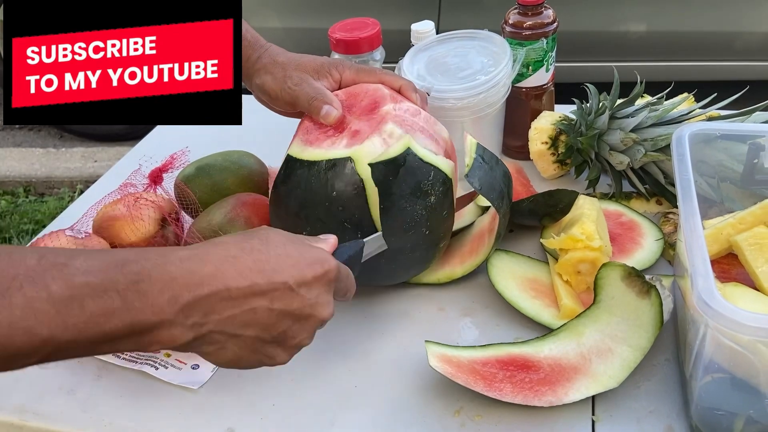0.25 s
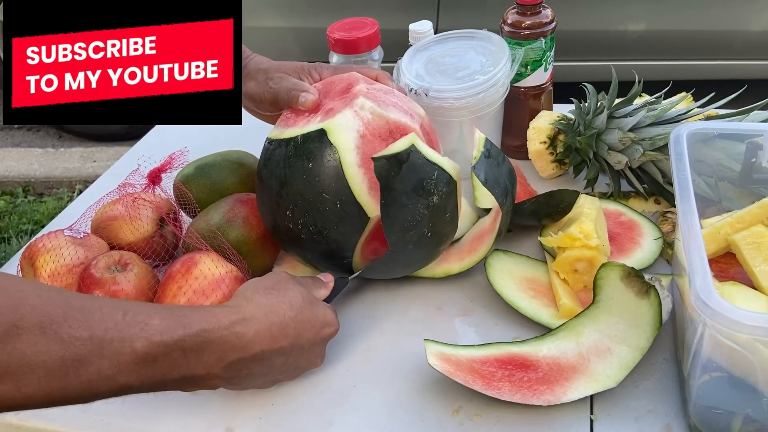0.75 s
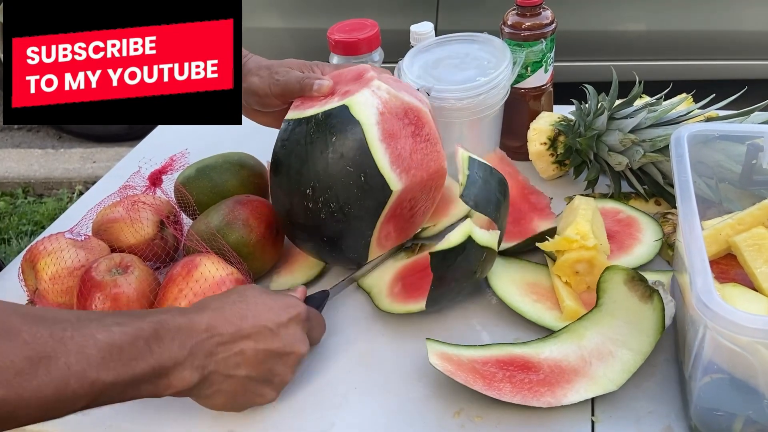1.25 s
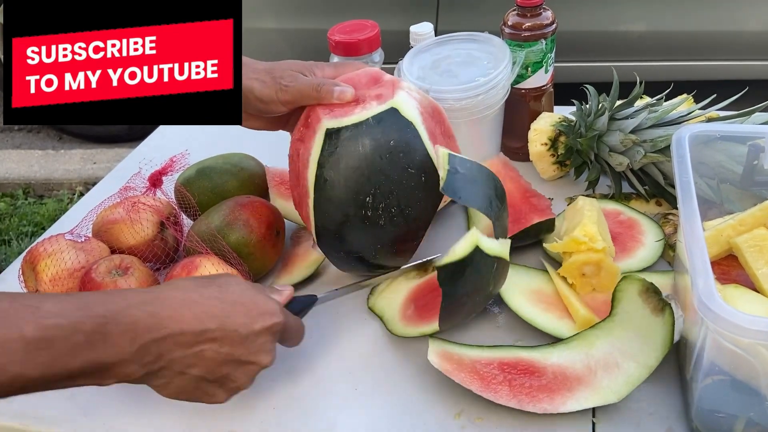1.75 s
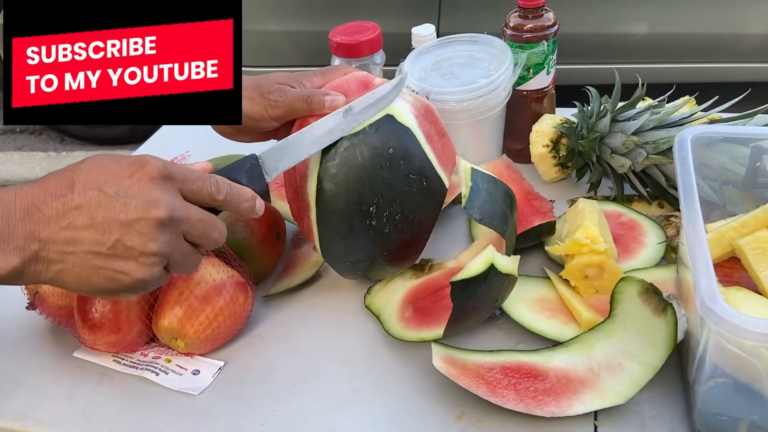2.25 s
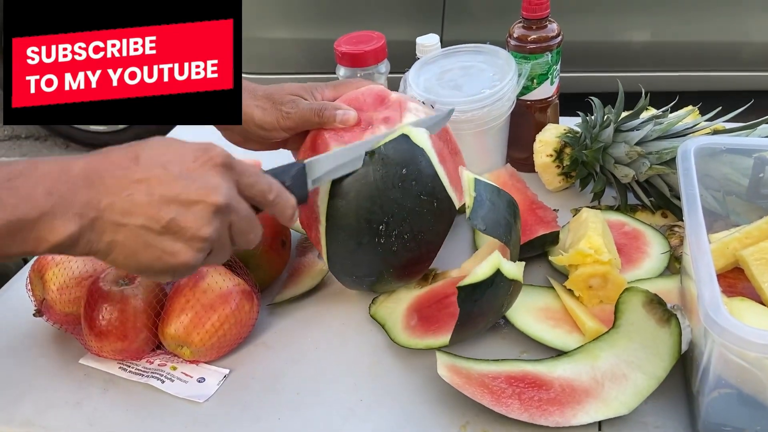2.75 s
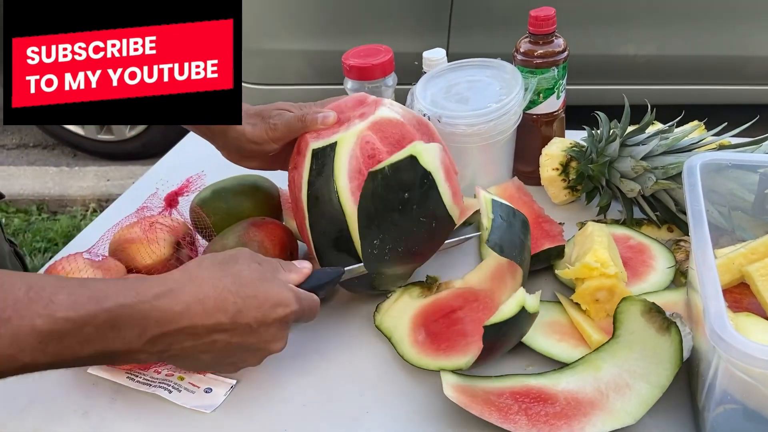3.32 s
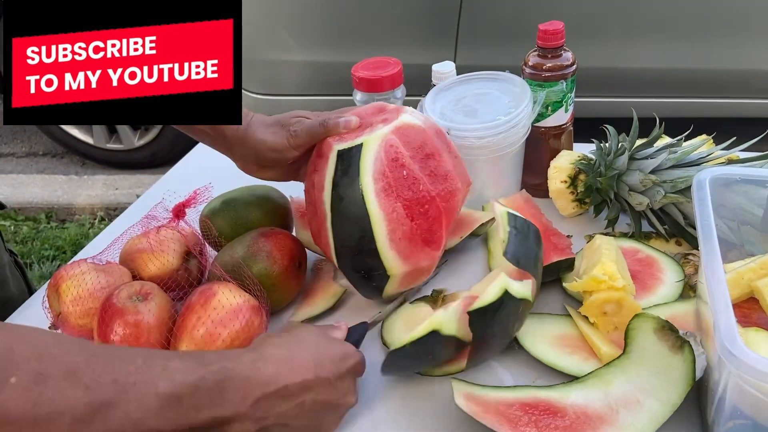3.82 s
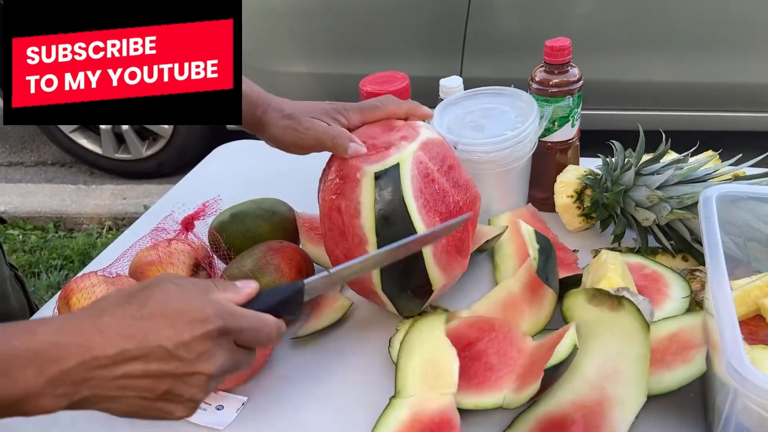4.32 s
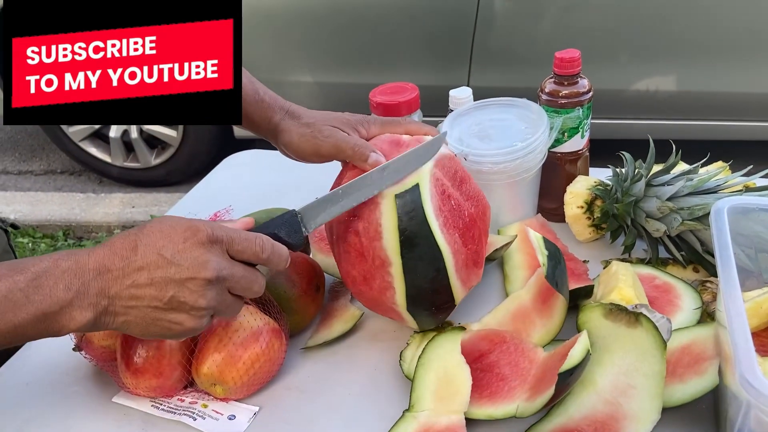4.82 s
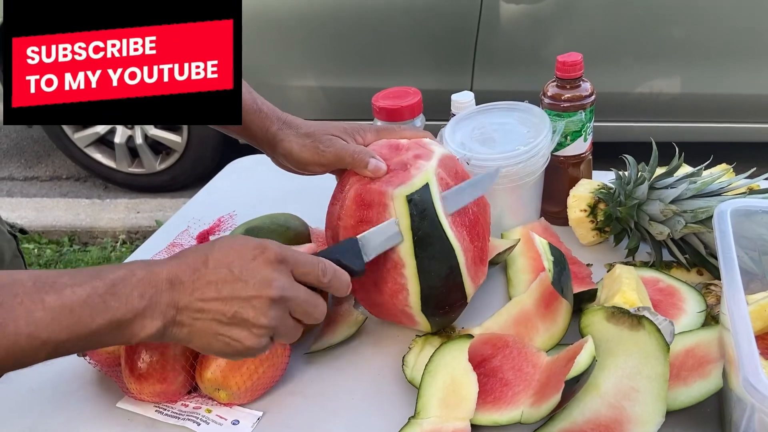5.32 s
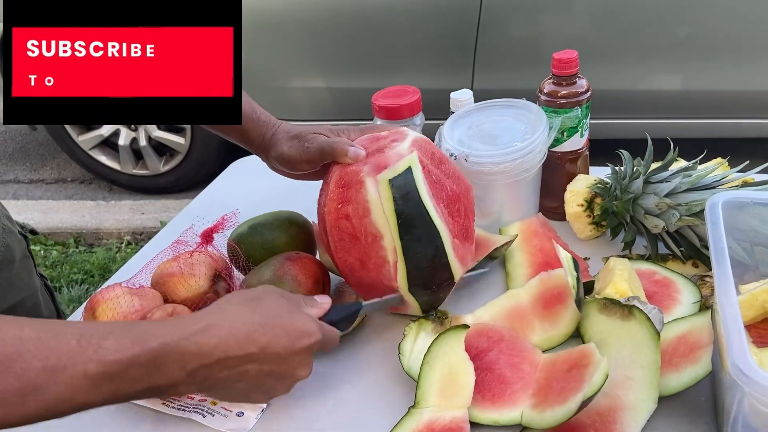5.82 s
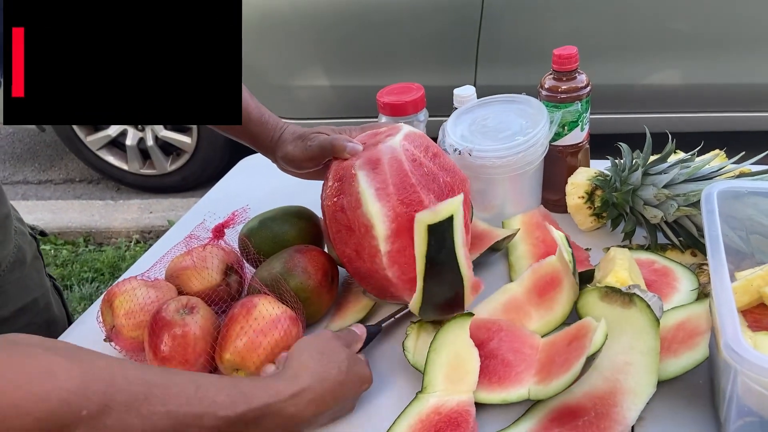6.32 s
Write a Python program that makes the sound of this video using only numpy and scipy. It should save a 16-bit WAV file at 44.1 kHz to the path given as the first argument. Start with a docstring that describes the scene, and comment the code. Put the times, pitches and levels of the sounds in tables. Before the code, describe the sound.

A knife saws rind off a watermelon with wet hisses and crisp cracks, while wind thumps on the microphone outdoors.

```python
"""Low puffs of wind thump over the wash of a far street, while a wet hiss and crunch comes close by:
a kitchen knife is sawing the rind off a watermelon on a table outdoors. The blade wipes and bursts
wet cells, the rind cracks, the slit rings as it opens, and cut pieces clatter on the table with a low
body. Wind puffs as it hits the microphone's two openings (ports). The street adds a few faint tones."""
import sys
import numpy as np
from scipy import signal
from scipy.fft import rfft, irfft, next_fast_len
from scipy.io import wavfile
from scipy.ndimage import uniform_filter1d, map_coordinates

SR = 44100
rng = np.random.default_rng(int(sys.argv[2]) if len(sys.argv) > 2 else 0)


def put_to_file(sound):
    """Save the sound as 16-bit audio at rate SR, in the file named by the first command-line argument."""
    columns = np.atleast_2d(sound).T  # one column per channel
    safe = np.clip(columns, -1, 1)
    whole_steps = np.round(safe * 32767)
    wavfile.write(sys.argv[1], SR, whole_steps.astype(np.int16))


N = 289560


def amp(db):
    """Turns decibels into a number to multiply by."""
    return 10 ** (np.asarray(db) / 20)


def unit(x):
    """Scales a sound to an average power of 1."""
    return x / np.sqrt(np.mean(x ** 2) + 1e-20)


def curve(points):
    """Joins (seconds, value) points with straight lines, giving one value per sample."""
    times, values = np.transpose(points)
    return np.interp(np.arange(N) / SR, times, values)


def wobble(rate):
    """A smooth random curve that passes through `rate` random values a second."""
    values = rng.standard_normal(int(N * rate / SR) + 4)
    return map_coordinates(values, [np.arange(N) * rate / SR])


def filtered(x, response):
    """Filters x; response(hz) says how much each frequency is scaled and shifted."""
    size = next_fast_len(x.shape[-1] + 8192)
    return irfft(rfft(x, size) * response(np.fft.rfftfreq(size, 1 / SR)), size)[..., :x.shape[-1]]


def noise(spectrum, lumps_db):
    """Two unrelated noises with the same tone colour and the same ups and downs in level."""
    freqs, db = np.transpose(spectrum)
    pair = amp(lumps_db) * rng.standard_normal((2, N))
    return unit(filtered(pair, lambda hz: amp(np.interp(np.log(hz + 1), np.log(freqs + 1), db))))


def even(pair, over_s):
    """Evens out the slow ups and downs of a noise, so that no surge falls into a lull."""
    power = np.abs(uniform_filter1d((pair ** 2).mean(axis=0), size=round(over_s * SR)))
    return unit(pair / np.sqrt(power + .05))


def resonance(centre_hz, width_hz, f):
    """A filter shape, over the frequencies f, that rings at one pitch."""
    return 1j * f * width_hz / (centre_hz ** 2 - f * f + 1j * f * width_hz)


def modes(table, f):
    """Several resonances side by side, with alternating signs."""
    return sum((-1) ** k * amp(db) * resonance(hz, width, f) for k, (hz, width, db) in enumerate(table))


def swells(start, hold, db, rise_db, fall_db, rest_db, swell_db=0):
    """A gain that rises, holds and falls for each event, over a resting level; slopes are dB per 10 ms."""
    t = np.arange(0, N + 64, 64)[:, None] / SR
    before = (start - t).clip(0) / .01
    after = (t - start - hold).clip(0) / .01
    level_db = db + swell_db * np.clip((t - start) / hold, 0, 1) - rise_db * before - fall_db * after
    power = np.interp(np.arange(N) / SR, t[:, 0], (amp(level_db) ** 2).sum(axis=1))
    return np.sqrt(power + amp(rest_db) ** 2)


def add(track, start, sound):
    """Mixes a two-part sound into the track at `start` seconds."""
    at = round(start * SR)
    track[:, at:at + sound.shape[1]] += sound[:, :max(N - at, 0)]


def ports(pair, air):
    """Makes left and right from one part both ports share and one part in which they differ."""
    # How the two ports hear. Each row: frequency in Hz, left over right in dB, then the right's lead in
    # radians and the likeness (0 to 1) for the knife, then those two again for the air.
    hearing = [(60, 0, 0, .95, 0, .94), (250, .5, -.2, .95, -.2, .88), (500, 2.5, -.4, .9, -.4, .5),
               (900, 2, -.4, .8, .8, .15), (1500, 1.5, -.6, .7, 3.5, .3), (2400, 2.5, -.6, .95, 5.7, .7),
               (3300, 3, -.5, .7, 5.8, .4), (4300, 3, -.4, .85, 5.9, .6), (5600, 3, .1, .3, 6.3, .2),
               (6700, 0, 0, .99, 6.3, .99), (15500, 0, 12.5, .99, 18.8, .99)]
    freqs, tilt_db, *ways = np.transpose(hearing)
    lead, alike = ways[2:] if air else ways[:2]
    side = np.array([[-1], [1]])  # left, right

    def blend(hz):
        angle = np.arccos(np.clip(np.interp(hz, freqs, alike), 0, 1)) / 2
        return np.array([np.cos(angle), np.sin(angle)])

    def place(hz):
        phase_shift = np.exp(side * .5j * np.interp(hz, freqs, lead))
        return phase_shift * amp(-side * np.interp(hz, freqs, tilt_db) / 2)

    shared, different = filtered(pair, blend)
    return filtered(np.array([shared + different, shared - different]), place)


def street():
    """Far traffic and leaves: a smooth wash that rings faintly in a few narrow bands."""
    # The colour of the wash. Each row: frequency in Hz, relative level in dB.
    colour = [(30, 22.5), (70, 23.5), (200, 10.5), (600, 5.5), (850, 1), (1100, 4), (1500, -1.5),
              (1900, 0.5), (2300, -1), (2800, -4.5), (3300, -9), (6500, -15), (15500, -34.5)]
    # The street's loudness. Each row: time in seconds, level in dB.
    loudness = [(0, -36), (1.3, -36), (1.8, -39), (3.1, -40), (3.7, -38.5), (4.2, -41), (6.57, -39.5)]
    # Bands that stand out of the wash. Each row: pitch in Hz, width in Hz, relative level in dB.
    bands = [(950, 40, 0), (1120, 60, 0), (2300, 160, 1)]
    # How those bands fade. Each row: time in seconds, gain in dB.
    band_fade = [(0, 0), (2.6, -1.5), (3.2, -10), (6.57, -9)]
    wash = noise(colour, 1.27 * wobble(6))
    rings = filtered(noise(colour, 2.5 * wobble(9)), lambda f: modes(bands, f))
    return amp(curve(loudness)) * (wash + amp(curve(band_fade)) * rings)


def street_tones():
    """Faint wavering tones from the street: each swells, slides down a little and fades."""
    # The tones. Each row: start and end in seconds, first and last pitch in Hz, level in dB.
    tones = [(.55, .74, 245, 235, -47), (.3, .46, 942, 938, -56), (.61, .7, 500, 495, -52)]
    out, t = np.zeros(N), np.arange(N) / SR
    for start, end, start_hz, end_hz, db in tones:
        progress = np.clip((t - start) / (end - start), 0, 1)
        hz = (start_hz + (end_hz - start_hz) * progress) * (1 + .006 * wobble(12))
        arch = np.sqrt(2 * np.abs(np.sin(np.pi * progress)))
        out += amp(db + 2 * wobble(16.7)) * arch * np.sin(2 * np.pi * np.cumsum(hz) / SR)
    return out


def wind_and_clatter_body():
    """Wind on the ports, plus the low body of the pieces' clatter: a lumpy rumble and a faster flutter."""
    # Gusts of wind, plus the low body of the cut pieces' clatter at about 3.6 s.
    # Each row: start and hold in seconds, rumble in dB, flutter in dB relative to the rumble.
    surges = [(0.126, 0.049, -29.5, -13), (0.483, 0.043, -39, -0.5), (0.717, 0.04, -31.5, -1.5),
              (0.779, 0.085, -25.5, -4), (0.904, 0.035, -30.5, -2.5), (0.965, 0.089, -28.5, -5),
              (1.082, 0.089, -28, 0.5), (1.203, 0.087, -33, 4), (1.359, 0.14, -28.5, -1),
              (1.607, 0.023, -22.5, -41), (1.774, 0.099, -30, -36), (1.908, 0.056, -27.5, -13.5),
              (2.052, 0.065, -27, -16), (2.272, 0.078, -34, -29), (2.736, 0.063, -36, -8),
              (2.856, 0.1, -31.5, 0), (3.118, 0.12, -26.5, -16), (3.493, 0.11, -39.5, -1.5),
              (3.622, 0.095, -44.5, 11.5), (3.739, 0.053, -46, 10.5), (3.808, 0.023, -48, 14.5),
              (3.987, 0.04, -28.5, 3.5), (4.076, 0.035, -23.5, -6), (4.142, 0.054, -33, -0.5),
              (4.2, .06, -24, -4.5), (4.321, 0.028, -33.5, 3), (4.401, 0.048, -30, 3.5),
              (4.481, 0.031, -20.5, -17), (4.55, 0.03, -25, -15), (4.647, 0.11, -40.5, 7),
              (4.754, 0.032, -24, -28), (4.861, 0.046, -23.5, -11), (4.941, 0.11, -28.5, -33),
              (5.224, 0.2, -38.5, -11.5), (5.385, 0.11, -26.5, -10), (5.498, 0.12, -30, -11.5),
              (5.874, 0.043, -30.5, -19), (5.938, 0.033, -40, -1.5), (6.112, 0.14, -35, -10.5),
              (6.304, 0.025, -31.5, 1.5), (6.391, 0.058, -31, -6)]
    # The steady breeze underneath. Each row: time in seconds, rumble in dB.
    breeze = [(0, -48), (.35, -49), (.65, -39), (1.2, -29.5), (1.7, -43), (2.5, -41.5), (3.03, -46.5),
              (3.6, -47), (4.3, -32.5), (5.1, -40), (5.7, -46.5), (6.05, -53), (6.57, -37.5)]
    # The colours of the two noises. Each row: frequency in Hz, relative level in dB.
    rumble_colour = [(20, -55), (33, -32), (45, -2.5), (65, 3.5), (110, 2.5), (170, -10), (300, -23),
                     (600, -73)]
    flutter_colour = [(80, -20.5), (170, 2), (260, -2), (400, -4.5), (600, -15.5), (850, -24), (1200, -54)]
    start, hold, rumble_db, flutter_db = np.transpose(surges)
    breeze_db = curve(breeze)
    slopes = dict(rise_db=22.5, fall_db=10)
    rumble_gain = swells(start, hold, rumble_db, rest_db=breeze_db, **slopes)
    flutter_gain = swells(start, hold, rumble_db + flutter_db, rest_db=breeze_db - 15.5, **slopes)
    rumble = even(noise(rumble_colour, 2.5 * wobble(25)), over_s=.045)
    flutter = even(noise(flutter_colour, 4 * wobble(50)), over_s=.035)
    return rumble_gain * rumble + flutter_gain * flutter


def eddies():
    """Single whirls of air burst on the ports: each is a low puff whose pitch falls as it passes."""
    # The puffs. Each row: start in seconds, level in dB, sweep in Hz (the pitch starts about 1.5 sweeps
    # above floor_hz), relative level of the bright front in dB.
    puffs = [(0.137, -16, 60, -30), (0.16, -18, 45, -30), (0.709, -17, 148, -25), (0.796, -18, 236, -22),
             (0.819, -9, 300, -21), (0.857, -11.5, 195, -27), (0.917, -33, 160, -18), (1.041, -7, 214, -13),
             (1.089, -10, 172, -16), (1.222, -32, 143, -18), (1.235, -24, 145, -6), (1.378, -18, 144, -5),
             (1.404, -23, 192, 8), (1.413, -4, 147, -14), (1.445, -14, 168, -17), (1.589, -16.5, 159, -34),
             (1.604, -12, 40.4, -34), (1.916, -21, 162, -15), (2.09, -16.5, 242, -21), (2.3, -20, 50, -28),
             (2.87, -31, 217, -24), (2.925, -26, 312, -20), (2.949, -23, 206, -23),
             (3.199, -17, 155.1, -29), (3.554, -17.5, 236, -15), (3.806, -13, 265, -25),
             (3.947, -18.5, 161, -29), (3.989, -20, 228, -20), (4.004, -18, 206, -11),
             (4.025, -12, 170, -22), (4.055, -25.5, 510, -16), (4.074, -17, 203, -15),
             (4.097, -22.5, 380, -3), (4.142, -23, 382, -21), (4.203, -22, 293, -15), (4.221, -7, 139, -32),
             (4.241, -10, 190.3, -17), (4.316, -21, 165, -8), (4.337, -25, 217, 2.5),
             (4.417, -14.5, 334, -19), (4.439, -12.5, 188, -11), (4.479, -14, 149, -30),
             (4.55, -16, 240, -5), (4.646, -21, 183, -11), (4.72, -21, 209, -23), (4.747, -15, 181, -21),
             (5.232, -21.5, 294, -22), (5.331, -21.5, 156, -24), (5.367, -20, 179, -27),
             (5.398, -14, 149, -32), (5.422, -6.5, 146.5, -39), (5.543, -14.5, 142, -23),
             (5.597, -33, 143, -17), (5.979, -22.5, 198, -14), (6.159, -22.5, 198, -22),
             (6.306, -16, 211, -7.5), (6.371, -16.5, 159, -18), (6.403, -16, 136, -19)]
    life_s, floor_hz, front_hz = 0.0273, 70, 420
    out, t = np.zeros((2, N)), np.arange(SR // 8) / SR
    for start, db, sweep_hz, front_db in puffs:
        phase = rng.random((2, 1))
        cycles = floor_hz * t + sweep_hz * life_s * 0.561 * (1 - np.exp(-t / (life_s * 0.376)))
        shape = amp(-26 * t / life_s) * (1 - np.exp(-t / 0.0046))
        puff = shape * np.sin(2 * np.pi * (cycles + phase))
        # the smallest whirls arrive first and die quickly
        front_cycles = front_hz * t + 2.12 * (1 - np.exp(-t / 0.0036))
        front_shape = amp(front_db - 60 * t / 0.044) * (1 - np.exp(-t / 0.0022))
        front = front_shape * np.sin(2 * np.pi * (front_cycles + phase))
        add(out, start, amp(db) * (puff + front))
    return out


def wind_pops():
    """Each pop is one quick swing of air pressure, a little different at the two ports."""
    # The pops. Each row: start in seconds, level in dB, width in milliseconds.
    pops = [(0.784, -31, 0.44), (0.819, -23, 0.9), (0.857, -27, 0.67), (1.042, -13.5, 0.91),
            (1.089, -24, 0.8), (1.119, -15, 0.77), (1.223, -13, 0.79), (1.381, -14, 0.45),
            (1.405, -11, 0.92), (1.442, -12.5, 0.89), (2.929, -13.5, 0.6), (3.557, -25.5, 0.78),
            (3.987, -40, 0.88), (4.006, -21.5, 0.69), (4.056, -23, 1), (4.076, -24, 0.66),
            (4.097, -23.5, 0.59), (4.104, -20, 0.8), (4.144, -34, 0.74), (4.2, -25, 0.78),
            (4.225, -31, 0.71), (4.242, -19, 0.62), (4.316, -33, 0.7), (4.417, -20, 0.63), (4.481, -14, 1),
            (4.549, -21, 0.59), (4.647, -26, 0.64), (4.721, -27, 0.93), (5.396, -41, 0.99),
            (5.423, -17.5, 1), (6.305, -19.5, 0.88)]
    unlike = 0.7  # size of the part that differs, next to the shared part
    out, t = np.zeros((2, N)), np.arange(SR // 50) / SR
    for start, db, width_ms in pops:
        signs = np.sign(rng.standard_normal(2))
        from_peak = t / (width_ms / 1000) - 2.5
        swing = (1 - 2 * from_peak ** 2) * np.exp(-from_peak ** 2)
        add(out, start, amp(db) * np.outer(signs * [1, unlike], swing))
    return out


def slit():
    """The slit behind the blade rings as it opens: a narrow band of noise around one pitch."""
    # The openings. Each row: start and hold in seconds, pitch in Hz, level in dB.
    openings = [(0.023, 0.13, 2320, -48), (0.13, 0.12, 2750, -52), (0.289, .12, 2580, -66),
                (0.449, 0.08, 2970, -51), (1.11, 0.027, 6200, -45), (1.116, .04, 2070, -48),
                (1.167, 0.043, 2480, -41), (1.214, 0.036, 2500, -49), (1.27, 0.11, 2450, -56),
                (3.156, 0.06, 2303, -62), (3.502, 0.046, 2350, -48.5), (5.274, 0.069, 2260, -56),
                (5.274, 0.21, 4250, -54.5), (5.37, 0.15, 2310, -56), (5.655, 0.057, 3700, -51),
                (5.842, 0.03, 3870, -51), (6.296, .04, 2700, -61), (5.656, 0.061, 2560, -49),
                (5.722, 0.09, 2450, -51), (5.842, 0.068, 2430, -46.5)]
    out, fade_s = np.zeros((2, N)), .02
    for start, hold, hz, db in openings:
        t = np.arange(round((hold + 0.028) * SR)) / SR
        shape = np.clip(np.minimum(t, t[-1] - t) / fade_s, 0, 1)
        ring = filtered(rng.standard_normal((2, len(t))), lambda f: resonance(hz, .2 * hz, f) ** 2)
        add(out, start - fade_s, amp(db) * shape * unit(ring))
    return out


def hit(hz, treble_db, hollow_db, skin, fade_s):
    """A sharp blow and a wet spray (60 dB down after fade_s) ring a pitch, the skin and the body."""
    # The hollow body's resonances. Each row: pitch in Hz, width in Hz, relative level in dB.
    shell = [(466, 100, -1), (750, 165, 3), (1240, 99, -8), (1443, 79, -0.5)]
    t = np.arange(SR // 16) / SR
    spray = rng.standard_normal((2, len(t))) * (1 - np.exp(-t / 0.00045)) * amp(-60 * t / fade_s)
    blow = 11 * np.outer([1, .3], np.arange(len(t)) == SR // 1500)  # one sample long
    burst = spray + blow
    ring = filtered(burst, lambda f: resonance(hz, 0.31 * hz, f) ** 2 + modes(skin, f))
    hollow = filtered(burst, lambda f: modes(shell, f))
    snap = filtered(spray + blow / 2, lambda f: resonance(10500, 14000, f) ** 2)
    return amp(5.5) * ring + amp(hollow_db + 9) * hollow + amp(treble_db + 14.5) * snap


def knocks():
    """Cut pieces knock on the table, many with a hollow ring."""
    # The knocks. Each row: start in seconds, level in dB, pitch in Hz, treble and hollow gains in dB.
    landings = [(1.4772, -33, 3600, -25, 3), (3.621, -34, 3640, -42, 6), (3.629, -46, 2400, -30, 14.5),
                (3.6374, -43.5, 2200, -15, 15.5), (3.645, -37.5, 1400, -25, 11),
                (3.66, -38.5, 4000, -26, 11.5), (3.668, -42, 3870, -12, 12), (3.689, -26, 3270, -24, 3),
                (3.6983, -32, 3650, -23, 10.5), (3.713, -48, 3500, -22, 12), (3.652, -37, 1400, -25, 4),
                (3.748, -44, 2300, -25, 6), (3.778, -44, 3000, -26, 14), (3.893, -46, 2450, -30, -9),
                (3.905, -46, 2450, -30, 1), (3.858, -44, 3600, -30, -5), (3.773, -36, 1500, -25, 7),
                (3.739, -30.5, 3700, -17, 5), (3.764, -27.5, 3780, -13, -3), (3.7678, -26, 3070, -21, 1),
                (3.789, -29, 1300, -37, -9), (3.7645, -32, 5400, -18, -2), (3.7395, -38, 5200, -20, -7),
                (3.882, -42.5, 3700, -26, 12), (3.887, -36.5, 2400, -23, 5), (4.11, -29.5, 1430, -43, -17),
                (4.414, -52.5, 3600, -3.5, 7), (6.3388, -27, 3370, -30, 4), (6.343, -41, 3450, -28, 9)]
    # A loose piece's skin resonances. Each row: pitch in Hz, width in Hz, relative level in dB.
    piece_skin = [(2450, 70, -7), (3220, 170, -7), (3740, 56, -6.5), (4940, 260, -17)]
    out = np.zeros((2, N))
    for start, db, hz, treble_db, hollow_db in landings:
        add(out, start, amp(db) * hit(hz, treble_db, hollow_db, piece_skin, fade_s=0.037))
    return out


def cracks():
    """The rind breaks in short, sharp cracks that ring its hard green skin; one short, low knock of a cut piece
    on the table, near 1.48 s, is rung the same way."""
    # The cracks, plus one short, low knock of a cut piece near 1.48 s. Each row: start in seconds, level in dB,
    # pitch in Hz, treble gain in dB.
    breaks = [(.2738, -35, 1920, -15), (0.2882, -32, 1900, -20), (0.3275, -29, 5300, -16),
              (0.3284, -23.5, 1740, -21), (.367, -25.5, 1800, -16.5), (0.404, -32.5, 2220, -7.5),
              (0.775, -29, 2260, -21), (0.8707, -31.5, 2660, -10), (0.898, -34, 3920, -24),
              (1.091, -29, 6500, -15), (1.1093, -26, 2270, -14), (1.116, -26.5, 6350, -18),
              (1.1283, -25, 1930, -11.5), (1.135, -23.5, 2010, -27), (1.153, -22.5, 2040, -25),
              (1.1674, -31, 2570, -11), (1.187, -25.5, 2560, -25), (1.212, -28, 4400, -20),
              (1.221, -22, 2050, -20), (1.238, -23, 2390, -19), (1.2445, -20.5, 2440, -24),
              (1.286, -34, 2660, -13), (1.302, -17.5, 2030, -25), (1.3023, -27.5, 4100, -27),
              (1.3929, -16, 1920, -20), (1.3932, -34, 3770, -19), (1.4724, -27.5, 3500, -14),
              (1.4771, -17.5, 1110, -24), (1.4915, -41, 1500, -25), (1.8965, -39, 2200, -13),
              (3.086, -38, 2640, -27), (3.272, -33.5, 4300, -14), (3.284, -25.5, 1790, -19),
              (3.296, -31.5, 2750, -11), (3.3007, -40.5, 2730, -0.5), (3.3204, -48, 2460, 1),
              (3.338, -33, 2750, -13.5), (3.446, -35.5, 2690, -6), (3.502, -41, 2320, -3),
              (3.796, -35, 3700, -25), (3.805, -19, 6440, -23), (3.8068, -22, 3960, -12.5),
              (5.3655, -32, 2120, -32), (5.499, -36.5, 4200, -17), (5.626, -42, 2380, -24),
              (5.641, -24.5, 2580, -32), (5.6413, -29.5, 4140, -23), (5.7633, -32.5, 5700, -24),
              (5.778, -35, 2000, -22), (5.797, -35, 5300, -24), (5.807, -36, 2450, -25),
              (5.853, -32, 6200, -15), (5.944, -36.5, 2580, -24)]
    # The hard skin's resonances. Each row: pitch in Hz, width in Hz, relative level in dB.
    hard_skin = [(2560, 92, -2.5), (3700, 130, -8), (4300, 280, -9.5), (6200, 1240, -15)]
    out = np.zeros((2, N))
    for start, db, hz, treble_db in breaks:
        add(out, start, amp(db) * hit(hz, treble_db, hollow_db=-15, skin=hard_skin, fade_s=0.02))
    return out


def bursting_cells(per_second, spread_db):
    """Cells burst at random: a level in dB that jumps in tiny spikes of unequal size."""
    spikes = (rng.random(N) < per_second / SR) * amp(spread_db * rng.exponential(size=N))
    tail = amp(-60 * np.arange(SR // 100) / SR / 0.0024)
    return 20 * np.log10(1 + signal.fftconvolve(spikes, tail)[:N].clip(0))


def blade():
    """The steel wipes wet flesh (hiss) and bursts the cells of the rind (crunch)."""
    # Pushes of the blade. Each row: start and hold in seconds, hiss in dB, crunch in dB,
    # change in level over the hold in dB.
    strokes = [(0, 0.035, -64, -46.5, -5.5), (0.058, 0.051, -50, -49.5, 0), (0.155, 0.06, -45.5, -43, 1.5),
               (0.264, 0.16, -51, -49.5, 3), (0.461, 0.076, -43.5, -48.5, -2), (0.578, 0.22, -54.5, -51, 1),
               (0.871, 0.038, -51.5, -52.5, 11.5), (1.123, 0.093, -37, -42, -3),
               (1.258, 0.047, -56, -55, 7.5), (1.452, 0.027, -67, -48, 11), (1.908, 0.017, -65, -70, 9),
               (2.588, 0.045, -58.5, -61, 3.5), (2.73, 0.25, -53, -52.5, 2.5), (3.066, 0.033, -72, -50, -1),
               (3.149, 0.066, -44.5, -41.5, 1.5), (3.283, 0.071, -48, -43.5, -9),
               (3.442, 0.079, -48.5, -52.5, 12), (3.652, 0.078, -64, -66, -4),
               (3.771, 0.13, -53.5, -50, -1.5), (4.306, 0.035, -56, -55, -4), (4.804, .04, -59, -59, 0),
               (4.932, 0.026, -56.5, -60, -5), (5.243, 0.096, -50, -51, -1), (5.388, 0.15, -47, -45, -6.5),
               (5.628, 0.081, -45, -45, -1.5), (5.75, 0.075, -45, -50, -1.5),
               (5.852, 0.029, -41.5, -42.5, -0.5), (5.969, 0.095, -51, -49.5, -13.5),
               (6.143, 0.059, -49, -42.5, -9), (6.29, 0.039, -77, -52.5, 8), (6.407, 0.17, -58.5, -72, 8)]
    # The colours of the two noises. Each row: frequency in Hz, relative level in dB.
    hiss_colour = [(1500, -21), (4000, 7.5), (6500, 5.5), (12000, 7), (15500, 4.5)]
    crunch_colour = [(600, -13), (1300, -1.5), (1800, 5.5), (2100, 3.5), (2450, 2.5), (2900, 0.5),
                     (3400, 0), (3900, -5), (4500, -6.5), (5000, -4), (5600, -11), (6200, -10),
                     (8000, -8.5)]
    start, hold, hiss_db, crunch_db, swell_db = np.transpose(strokes)
    push = dict(rise_db=3.5, fall_db=5, swell_db=swell_db)
    # between pushes, blade and fingers resting on the wet fruit still sound faintly
    hiss_gain = swells(start, hold, hiss_db, rest_db=-66.5, **push)
    crunch_gain = swells(start, hold, crunch_db, rest_db=-72.5, **push)
    cells_db = bursting_cells(per_second=260, spread_db=1.5) + 2.33 * wobble(60)
    hiss = noise(hiss_colour, 0.43 * cells_db)
    crunch = noise(crunch_colour, cells_db + 1.3 * wobble(40))
    return hiss_gain * hiss + crunch_gain * crunch


def scene():
    """The knife reaches both ports much alike; wind and the far wash differ more from side to side."""
    cutting = blade() + cracks() + knocks() + slit()
    outdoors = wind_and_clatter_body() + eddies() + wind_pops() + street()
    return ports(cutting, air=False) + ports(outdoors, air=True) + street_tones()


def record(dry):
    """The microphone loses the deepest bass, and the very highest treble is cut off."""
    bass_hz, top_hz = 39.5, 15800
    return filtered(dry, lambda hz: (hz < top_hz) / np.sqrt(1 + (bass_hz / (hz + 1)) ** 8))


dry = scene()
out = record(dry)
put_to_file(out)
```